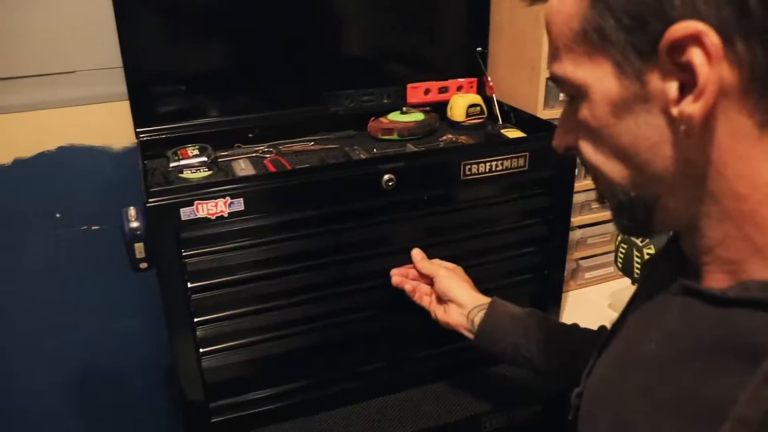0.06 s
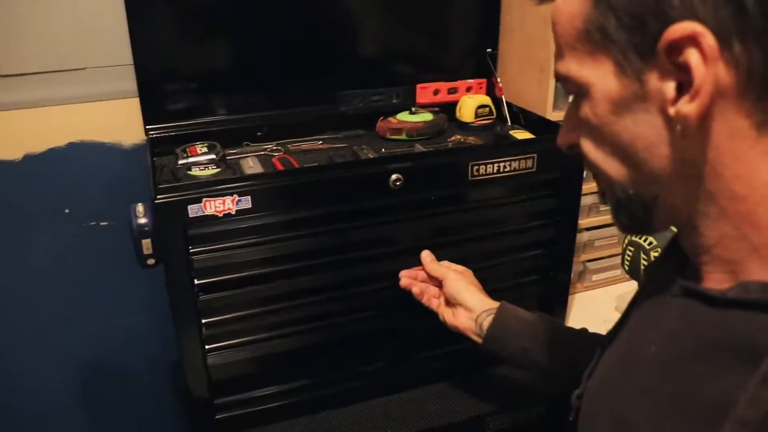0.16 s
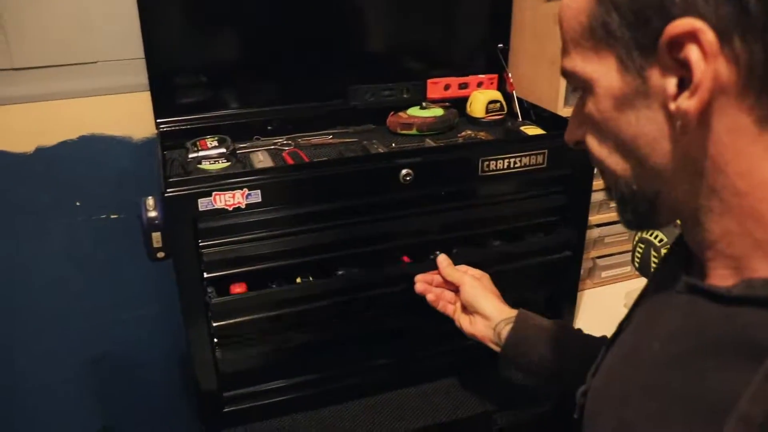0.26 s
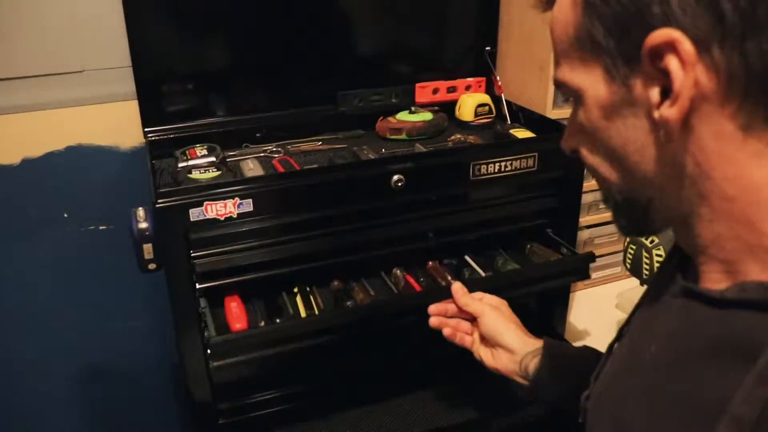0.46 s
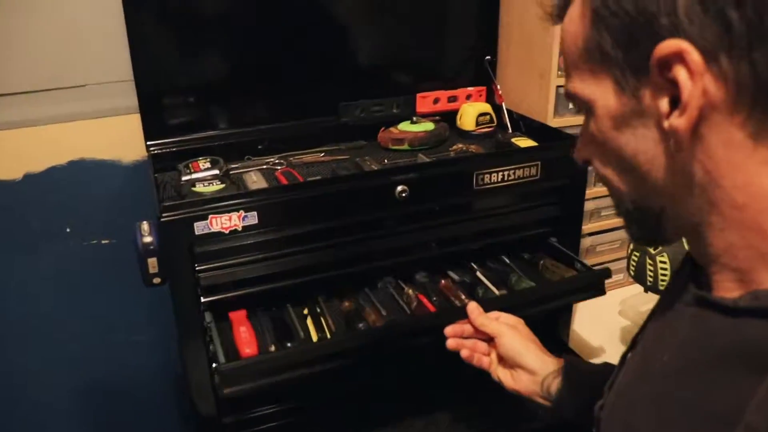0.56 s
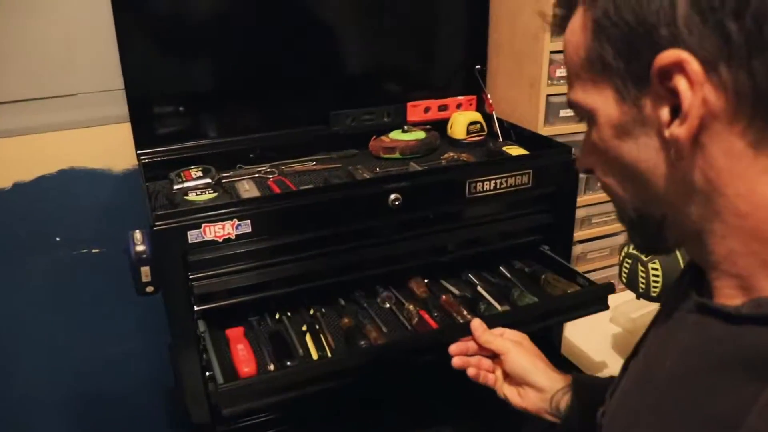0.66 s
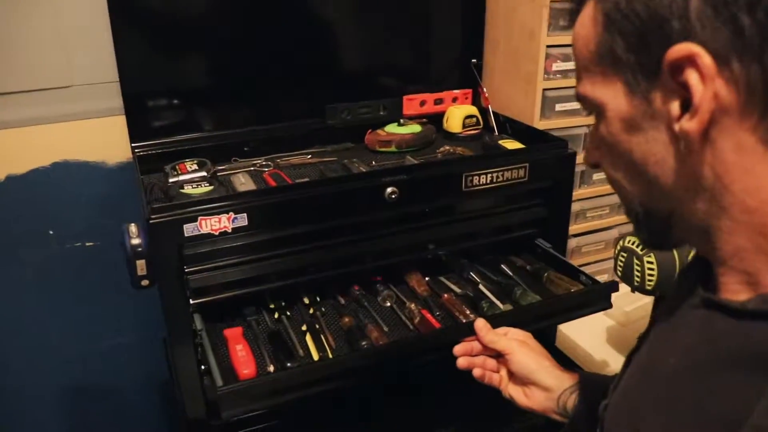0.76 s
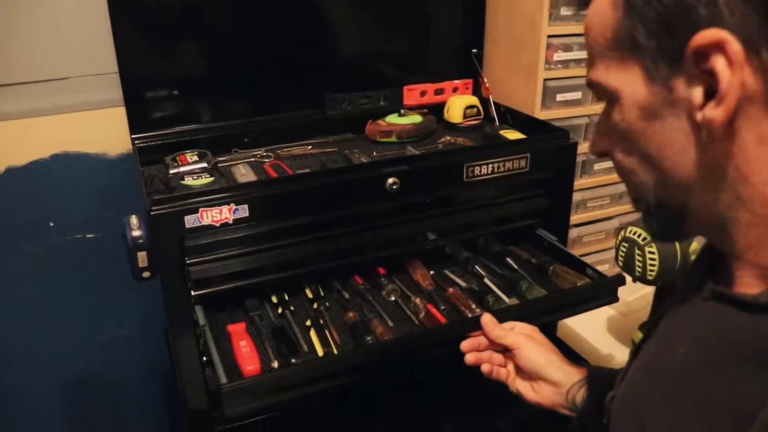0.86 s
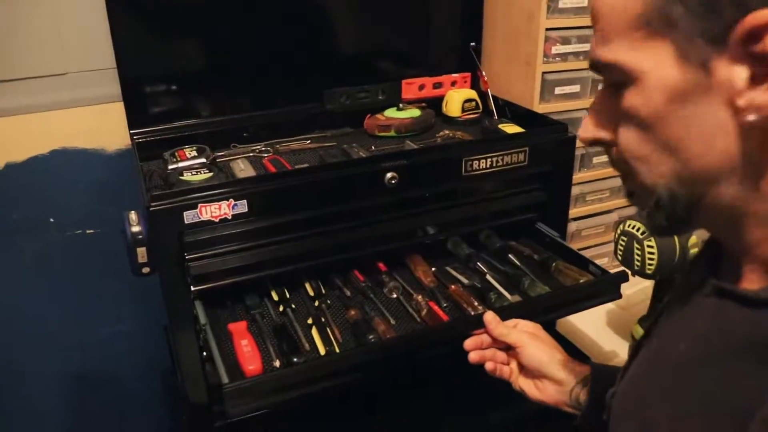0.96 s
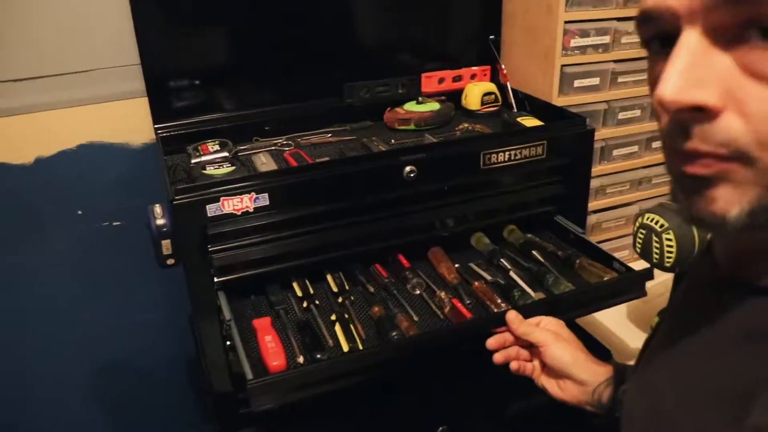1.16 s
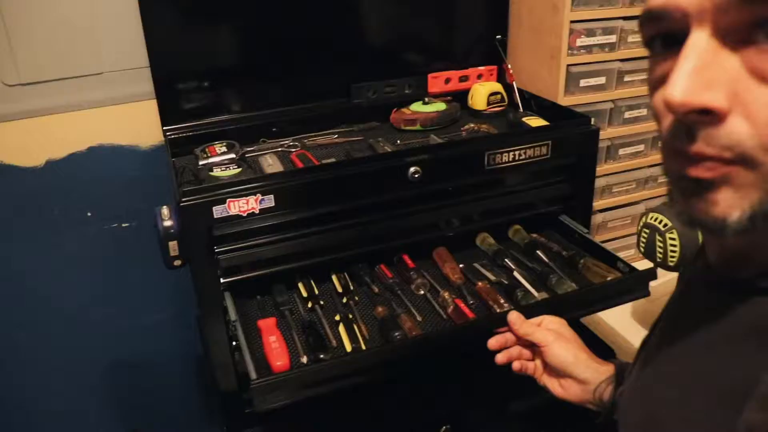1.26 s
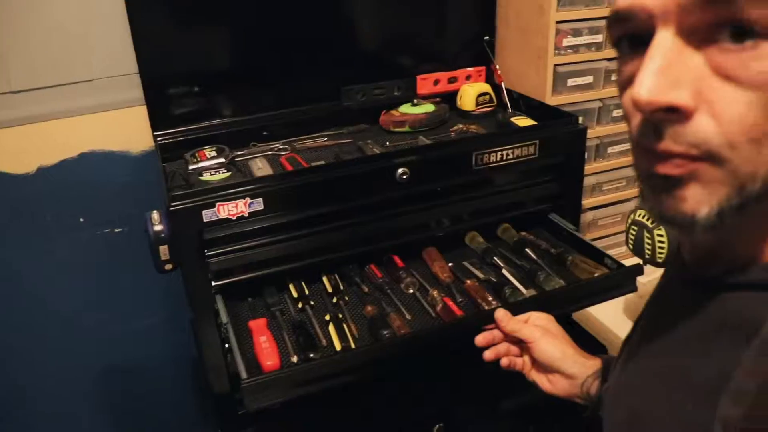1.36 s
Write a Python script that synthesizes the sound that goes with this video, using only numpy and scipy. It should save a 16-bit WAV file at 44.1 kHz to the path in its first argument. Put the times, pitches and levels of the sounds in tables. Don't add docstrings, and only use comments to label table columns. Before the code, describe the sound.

Steel tool drawer pulled open with a rattling rumble, then a sharp knock and tool clatter

```python
import sys
import numpy as np
from scipy import signal
from scipy.fft import rfft, irfft, next_fast_len
from scipy.io import wavfile
from scipy.ndimage import uniform_filter1d

SR = 44100
rng = np.random.default_rng(int(sys.argv[2]) if len(sys.argv) > 2 else 0)


def voltage_ratio(decibels):
    exponent = np.asarray(decibels, float) / 20
    return 10 ** exponent


def log_audio(samples):
    frames = np.atleast_2d(samples).T
    limited = np.clip(frames, -1, 1)
    pcm = np.round(limited * 32767).astype(np.int16)
    wavfile.write(sys.argv[1], SR, pcm)


N = 61739
T = np.arange(N) / SR

# f/Hz, width/Hz, level/dB
PAN_MODES = [(142, 20, -9), (236, 18, 0), (270, 28, -2), (415, 25, -5), (470, 40, -8)]
# f/Hz, width/Hz, level/dB
FRONT_MODES = [(675, 16.4, -7.5), (809, 27, 0), (1005, 43, 1.5), (1167, 52, -2.5), (1420, 83, 1),
               (1686, 76, -2)]


def unit(x):
    return x / np.sqrt(np.mean(x ** 2))


def band(x, hz, width_hz):
    return signal.lfilter(*signal.iirpeak(min(hz, .4 * SR), hz / width_hz, SR), x)


def filtered(x, order, hz, kind="low"):
    return signal.sosfilt(signal.butter(order, hz, kind, fs=SR, output="sos"), x)


def colour(x, points):
    point_hz, point_db = np.array(points).T
    size = next_fast_len(len(x) + 2048)
    log_hz = np.log(np.arange(size // 2 + 1) * SR / size + 1)
    gain = voltage_ratio(np.interp(log_hz, np.log(point_hz), point_db, right=-90))
    return irfft(rfft(x, size) * gain, size)[:len(x)]


def ring(x, modes, share):
    out = 0
    for hz, db, t60_s in modes:
        struck_hz = hz * (1 + 0.016 * rng.standard_normal())
        pole = np.exp(2j * np.pi * struck_hz / SR - np.log(1000) / (t60_s * share * SR))
        gain = voltage_ratio(db + 1.96 * rng.standard_normal())
        out = out + gain * signal.lfilter([1], [1, -pole], x).imag
    return out


def fade(start_s, t60_s, rise_s):
    t = np.maximum(T - start_s, 0)
    return (1 - np.exp(-t / rise_s)) * voltage_ratio(-60 * t / t60_s)


def swell(start_s, length_s):
    return np.sin(np.pi * np.clip((T - start_s) / length_s, 0, 1))


def push(start_s, ms):
    t = (T - start_s) / (ms / 1000)
    force = np.where((t > 0) & (t < 1), np.sin(np.pi * t) ** 2, 0)
    return force / force.sum()


def walk(rate_hz):
    k = int(SR / rate_hz)
    steps = np.repeat(rng.standard_normal(N // k + 1), k)
    return unit(uniform_filter1d(uniform_filter1d(steps, k), k)[:N])


def tone(hz, wobble_hz, wobble_db):
    level = voltage_ratio(wobble_db * walk(60.06))
    phase = 2 * np.pi * np.cumsum(hz + wobble_hz * walk(92.7)) / SR
    return unit(level * np.sin(phase))


def balls():
    balls_per_s, spread_db = 7000, 2.5
    hit = rng.random(N) < balls_per_s / SR
    size = rng.exponential(size=N)
    return hit * voltage_ratio(spread_db * size) * np.sign(rng.standard_normal(N))


def body(peaks, sheet):
    sheet_db = 2.5
    clear = sum(voltage_ratio(db) * unit(band(balls(), hz, width_hz)) for hz, width_hz, db in peaks)
    return unit(unit(clear) + voltage_ratio(sheet_db) * unit(colour(balls(), sheet)))


def slide():
    # t/s, pan level/dB, front plate share/dB, rail share/dB
    pull = [
        [(0.187, -36.5, 7.5, -6), (0.215, -33.5, -7, -10), (0.243, -23, -4.5, -12), (0.255, -18, 0.5, -9.5),
         (0.295, -25.5, -1, -2), (0.343, -28.5, -0.5, -12.5), (0.361, -34, 2, 0), (0.37, -37.5, 1.5, -7.5)],
        [(0.385, -34, -1.5, -7.5), (0.448, -32.5, -5.5, -17.5), (0.459, -37, -4.5, -11), (0.611, -47.5, 1, -4),
         (0.675, -46.5, -9.5, -5), (0.689, -51, 6.5, -1), (0.711, -43.5, -2.5, -8), (0.731, -50.5, 4.5, -4),
         (0.758, -36, -12, -13)],
    ]
    # f/Hz, width/Hz, level/dB
    rail_modes = [(2098, 110, 2), (2520, 170, -6.5), (3104, 29, -2), (3810, 130, -4), (4650, 300, -5),
                  (5380, 280, -5.5)]
    # f/Hz, level/dB per Hz
    pan_sheet = [(60, -40), (140, -10), (190, -16), (255, 0), (350, -11), (440, -4), (600, -13),
                 (1200, -46)]
    front_sheet = [(300, -53), (520, 2), (1000, -6), (1700, -4), (2600, -29.5), (5000, -48)]
    rail_sheet = [(1200, -33), (1900, 2), (3100, -4), (5450, -21.5), (9000, -18.5), (11500, -50),
                  (15000, -55)]
    take_up_s, rail_top_hz, pan_floor_hz = .012, 11000, 128

    curve = np.vstack(pull)
    t_s, pan_points_db, front_points_db, rail_points_db = curve.T
    pan_db = np.interp(T, t_s, pan_points_db, left=-90, right=-90)
    front_db = np.interp(T, t_s, front_points_db)
    rail_db = np.interp(T, t_s, rail_points_db)

    rail = filtered(body(rail_modes, rail_sheet), 3, rail_top_hz)
    steel = body(PAN_MODES, pan_sheet) + voltage_ratio(front_db) * body(FRONT_MODES, front_sheet) + voltage_ratio(rail_db) * rail
    grip = np.clip((T - t_s[0]) / take_up_s, 0, 1)
    out = voltage_ratio(pan_db) * grip * steel + squeaks() + roller_hum() + jolts()
    return filtered(out, 6, pan_floor_hz, "high")


def jolts():
    # t/s, level/dB, contact time/ms
    blows = [(0.226, -22.5, 1.4), (.241, -22.5, 0.56), (0.248, -16.5, 0.69), (0.2549, -13, 0.38),
             (.258, -21, 1.25), (0.262, -28, 0.31), (.269, -25, 0.23), (0.279, -23.5, 0.84),
             (0.29, -24, 1.2), (.311, -26, 0.63), (0.302, -19, .7), (.322, -31, 0.2), (.329, -21.5, 1.16),
             (.337, -23.5, 1.7), (.343, -22, 1.9), (0.374, -30, 1.6), (.398, -36, 2.1), (0.419, -28, 1.7),
             (.437, -31.5, 1.2), (.235, -21, 0.94), (.21, -27, 1.3), (0.192, -32.5, 1.04)]
    ring_share = 0.8
    modes = [(hz, db, ring_share * 2.04 / width_hz) for hz, width_hz, db in PAN_MODES]
    modes += [(hz, db - 3.5, ring_share * 2.25 / width_hz) for hz, width_hz, db in FRONT_MODES]
    return sum(voltage_ratio(db) * rng.choice([-1, 1]) * ring(push(s, ms), modes, 0.75) for s, db, ms in blows)


def squeaks():
    # t/s, length/s, level/dB
    chirps = [(.188, .036, -45), (.226, .032, -44), (.256, .03, -45)]
    start_hz, sag_hz_per_s = 4530, 1300
    level = sum(voltage_ratio(db) * swell(s, length_s) for s, length_s, db in chirps)
    return level * tone(start_hz - sag_hz_per_s * (T - chirps[0][0]), 5, .7)


def roller_hum():
    start_s, length_s, level_db = .46, .3, -50
    return voltage_ratio(level_db) * swell(start_s, length_s) * unit(band(balls(), 620, 70))


def knocks():
    # t/s, peak level/dB, thud level/dB, ring length share, contact time/ms
    blows = [
        (0.7637, -25, -6, 0.49, 0.25),
        (.766, -18, -6.5, 0.67, 0.11),
        (.769, -22, 2, 0.93, 0.1),
        (0.7812, -29, 4, 0.66, 0.14),
        (0.797, -31.5, -5, 0.63, 0.084),
        (.812, -24.5, -1, 0.62, 0.16),
        (.82, -34.5, 7, .5, .2),
        (.837, -40, 11, 0.59, .2),
        (.871, -43.5, 13.5, 0.74, 0.33),
        (0.934, -57.5, 19.5, 1, .3),
    ]
    # f/Hz, level/dB, t60/s
    stop_modes = [(597.6, -8, .1), (1510, -4, .04), (2130, -2, .07), (2660, -4, .08), (2990, -6, .07),
                  (4230, -4, .12), (2380, -4, .06), (5430, -11, .05), (4350, -5, .08), (7180, -4, .03),
                  (7820, -7, .065), (7890, -6.5, .067), (9250, -13.5, .057), (1780, -6, .04)]
    # f/Hz, level/dB, t60/s
    thud_modes = [(111, -10, 0.21), (184.3, 6, 0.089), (220, 4.5, 0.26), (290.5, 3.5, 0.19)]
    # f/Hz, level/dB per Hz
    clatter_spectrum = [(410, -26), (700, -3), (1340, -3), (1650, -0.5), (3630, -5.5), (4300, -8),
                        (8000, -10), (15500, -40)]
    clatter_db, clatter_t60_s = -4.5, 0.25
    crack_t60_s, crack_ms, thud_ms = 0.0039, .07, 1.2

    out = 0
    for s, db, thud_db, share, ms in blows:
        grit = rng.standard_normal(N) * fade(s, crack_t60_s, 0.000099)
        crack = push(s, ms) + 0.4 * crack_ms / ms * grit / np.sqrt(np.sum(grit ** 2))
        stop = ring(crack, stop_modes, share)
        thud = voltage_ratio(thud_db) * ring(push(s, thud_ms), thud_modes, share)
        clatter = unit(colour(rng.standard_normal(N), clatter_spectrum))
        clatter = voltage_ratio(clatter_db) * clatter * fade(s, clatter_t60_s * share, 0.00022)
        out = out + voltage_ratio(db) * (0.29 * stop + 0.28 * thud + 0.36 * clatter)
    return out


def groans():
    # t/s, length/s, f/Hz, rms level/dB
    sung = [(.228, .05, 252, -19), (.232, .034, 450, -23), (.272, .03, 240, -23), (.285, .055, 412, -27),
            (.327, .03, 275, -23), (.763, .013, 1510, -26), (.764, .022, 4260, -35), (.764, .02, 7850, -38),
            (.044, .016, 490, -43), (.045, .014, 1800, -47), (1.358, .016, 1710, -46),
            (1.374, .03, 1780, -46), (1.348, .07, 1110, -50), (1.368, .018, 230, -40), (.54, .22, 622, -51),
            (.186, .035, 480, -38), (.19, .03, 1200, -46), (.236, .03, 1130, -28), (.24, .05, 142, -29),
            (.36, .035, 222, -32), (.425, .032, 290, -32), (.808, .035, 220, -31), (1.36, .03, 1430, -54),
            (.14, .022, 2600, -50), (.81, .016, 1750, -36)]
    return sum(voltage_ratio(db) * swell(s, length_s) * tone(hz, .012 * hz, 1.5) for s, length_s, hz, db in sung)


def ticks():
    onsets_s = [.002, .048, .095, .11, .112, .139, .14, .152, .251, .328, .347, .42, .765, .766, .813, .86,
                1.351, 1.352, 1.361, 1.375, 1.379]
    # level/dB, centre f/Hz, width/Hz, t60/s
    touches = [(-42, 280, 290, 0.072), (-45, 1350, 1080, 0.038), (-50.5, 1240, 2800, 0.92),
               (-33.5, 130, 310, 0.1), (-54, 7700, 6000, .03), (-41.5, 9200, 7500, 0.017),
               (-40, 1660, 4600, 0.29), (-32, 140, 340, 0.041), (-30.5, 3960, 5000, 0.46),
               (-56, 12000, 6000, .015), (-45, 12000, 6000, 0.022), (-50, 9900, 4200, 0.11),
               (-36, 6900, 10000, .04), (-34.5, 413, 110, 0.11), (-34.5, 1650, 520, 0.055),
               (-35, 254, 65, 0.16), (-33, 1340, 720, 0.017), (-53, 1440, 720, 0.28),
               (-53, 1630, 250, 0.051), (-41, 290, 450, 0.043), (-53, 2650, 190, 0.11)]
    click_db = 12.5
    out = 0
    for s, (db, hz, width_hz, t60_s) in zip(onsets_s, touches):
        scrape = rng.standard_normal(N) * fade(s, t60_s, 0.0004)
        click = voltage_ratio(click_db) * (np.arange(N) == int(s * SR))
        touch = band(band(scrape + click, hz, width_hz), hz, width_hz)
        touch = band(touch, hz, 2 * width_hz)
        out = out + voltage_ratio(db) * touch * np.sqrt(SR / width_hz / 1.53)
    return out


def cabinet():
    # t/s, level/dB, f/Hz
    boom = [(0.0, -66, 80), (0.037, -24.5, 82.9), (0.3, -47, 98.3), (0.328, -38, 96.64),
            (0.619, -32.5, 79.5), (0.684, -60, 77.6), (0.733, -20, 83.9), (0.778, -18, 88.7),
            (0.84, -55, 82), (0.865, -27.5, 78.6), (0.946, -31, 81.94), (0.989, -19, 84.2),
            (1.055, -34.5, 77.3), (1.15, -32, 91.9), (1.24, -45, 70.6), (1.4, -36, 77)]
    wobble_hz, wobble_db = 6.68, 2.1
    t_s, level_db, pitch_hz = np.array(boom).T
    hz = np.interp(T, t_s, pitch_hz) + wobble_hz * walk(29.22)
    level = voltage_ratio(np.interp(T, t_s, level_db) - 6.0 + wobble_db * walk(39.2))
    return level * np.sin(2 * np.pi * np.cumsum(hz) / SR)


def room(near):
    level_db, t60_s, top_hz = -15, 0.38, 2900
    tail = band(rng.standard_normal(N), top_hz / 4, top_hz) * fade(0.0044, t60_s, 0.0039)
    return voltage_ratio(level_db) * signal.fftconvolve(near, tail / np.sqrt(np.sum(tail ** 2)))[:N]


def workshop():
    # f/Hz, level/dB per Hz
    air_spectrum = [(12, -25), (30, -1), (75, -7), (130, -18.5), (268, -24), (916, -29.5), (1080, -28.5),
                    (1180, -35.5), (15800, -52)]
    # f/Hz, width/Hz, level/dB
    whine_bands = [(3910, 90, -70), (1070, 120, -66)]
    air_db, flicker_db, motor_hz, motor_db = -47.5, .6, 3500, -67
    air = colour(rng.standard_normal(N), air_spectrum)
    air = air / np.std(filtered(air, 4, 120, "high"))
    whine = sum(voltage_ratio(db) * unit(band(rng.standard_normal(N), hz, width_hz)) for hz, width_hz, db in whine_bands)
    motor = voltage_ratio(motor_db) * tone(motor_hz, 6, 1.5)
    return air * voltage_ratio(air_db + flicker_db * walk(6)) + whine + motor


def scene():
    near = slide() + knocks() + groans() + ticks()
    return (near + room(near) + cabinet() + workshop())[None]


def roll_off(x):
    return signal.sosfilt(signal.butter(12, 16500, fs=SR, output="sos"), x)


def record(dry):
    top_hz = 15800
    mix = signal.sosfilt(signal.ellip(8, .2, 40, top_hz, fs=SR, output="sos"), dry)
    return roll_off(mix)


dry = scene()
out = record(dry)
log_audio(out)
```